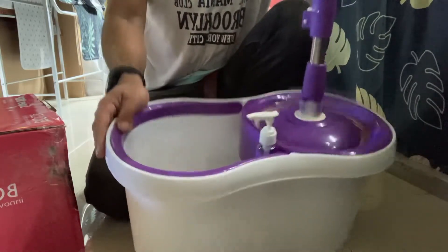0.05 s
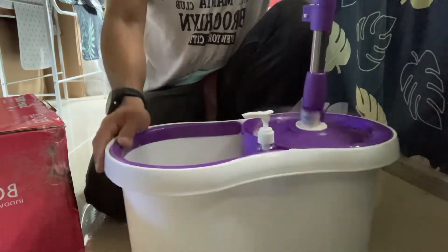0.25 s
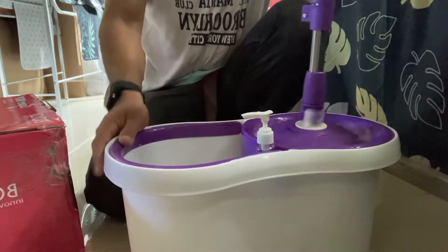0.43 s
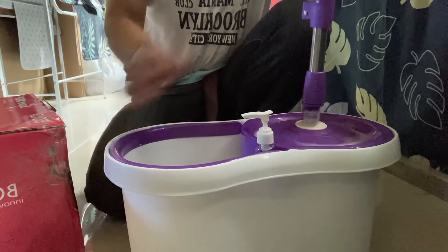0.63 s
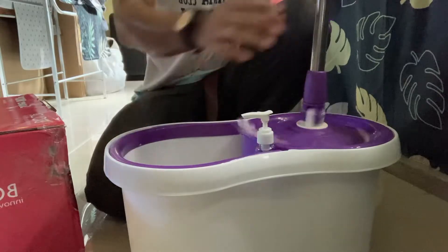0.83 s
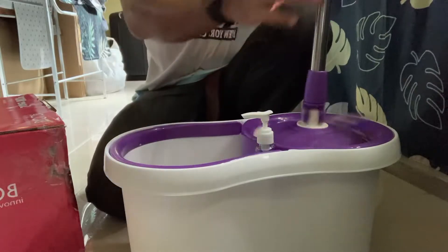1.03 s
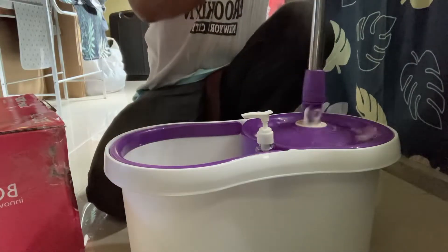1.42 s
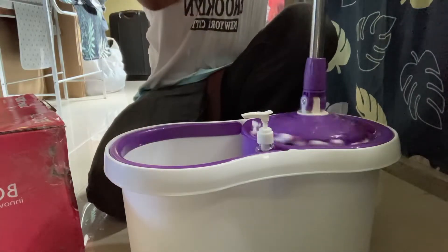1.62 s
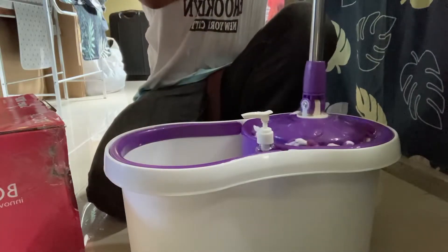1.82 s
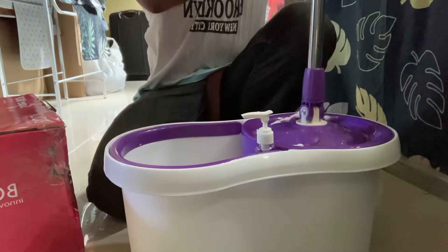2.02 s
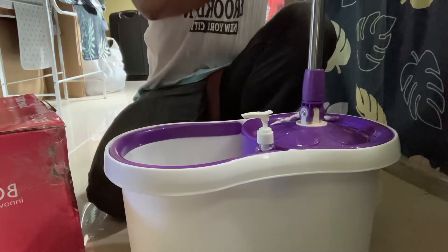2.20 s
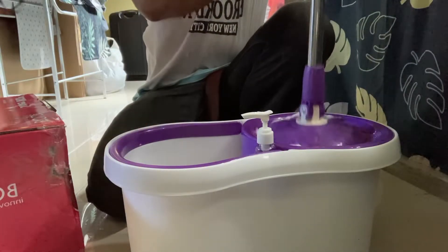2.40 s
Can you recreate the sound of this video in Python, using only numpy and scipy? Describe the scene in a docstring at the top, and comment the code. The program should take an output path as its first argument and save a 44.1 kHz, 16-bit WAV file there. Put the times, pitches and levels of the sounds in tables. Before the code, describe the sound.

A plastic mop bucket thumps onto a hard floor, followed by light clicks and knocks.

```python
"""A plastic spin-mop bucket lands on a hard floor: one edge touches, then the tub booms in its wall modes.
A hand grips the telescopic handle and snaps its lock; the mop head knocks in its basket.
The steel tube slides up with a thin squeak and pings at its catch. Plastic clicks and sleeves rustle.
Blows ring on in a small room, over a low appliance hum and faint room noise."""
import sys
import numpy as np
from scipy import signal
from scipy.fft import rfft, irfft, next_fast_len
from scipy.io import wavfile
from scipy.ndimage import map_coordinates

SR = 44100
rng = np.random.default_rng(int(sys.argv[2]) if len(sys.argv) > 2 else 0)


def to_wav(sig):
    """Store sig (one row per channel, or 1-D mono) as 16-bit WAV at the path in sys.argv[1].

    Samples outside -1..1 are clipped; the rate is SR.
    """
    pcm = np.clip(np.atleast_2d(sig), -1, 1) * 32767
    pcm = np.round(pcm).astype(np.int16)
    wavfile.write(sys.argv[1], SR, pcm.T)  # frames by channels


N = 112454

# bucket on the floor: start_s, level_db, cutoff_hz
LANDINGS = [(0.159, -37, 1190), (0.2312, -5, 7000)]
# tub wall modes: pitch_hz
TUB_MODES_HZ = [285, 350, 378, 450, 563, 620, 761, 872, 965, 1055, 1305, 1548, 1912, 2977]
# the same modes: level_db
TUB_MODES_DB = [-9, 2.5, 6.5, -13, -11.5, -6, -5, -3.5, -10.5, -6.5, -18, -8, -14.5, -23.5]
# tub bottom flexing: start_s, level_db, pitch_hz, t60_s
THUDS = [(0.1412, -9.5, 197.6, 0.056), (0.165, -26.5, 173, 0.12), (0.2396, 5, 171.8, 0.05),
         (1.4315, -28, 158, 0.092), (2.2805, -13.5, 172, 0.04)]
# mop gripped, then knocking in its basket: start_s, level_db, cutoff_hz
KNOCKS = [(0.8345, -37.5, 6000), (1.4255, -31.5, 1500), (1.4292, -24, 4540), (1.4515, -38.5, 3000)]
# mop head and handle modes: pitch_hz, level_db, t60_s
MOP_MODES = [(291.7, -0.5, 0.069), (337.5, -1.5, 0.059), (975, -16, 0.066), (1326, -8, 0.047),
             (1412, -13, 0.13), (1727, -9, 0.092), (2960, -11, 0.046), (3070, -13, 0.056),
             (4040, -15, 0.032)]
# collar and handle taps: start_s, level_db, pitch_hz, t60_s
TAPS = [(0.157, -39, 1220, .04), (0.8345, -28, 1330, 0.038), (0.836, -28, 1715, 0.037),
        (0.9985, -39.5, 2430, 0.024), (1.4335, -35, 1745, 0.039), (2.238, -41, 290, 0.058),
        (2.286, -35, 1140, 0.036), (2.399, -31, 950, 0.032)]
# plastic clicks and scuffs: start_s, mid_db, upper_db, treble_db, t60_s
CLICKS = [(0.081, -64, -45.5, -46.5, 0.043), (0.138, -36, -51, -59, 0.091), (0.156, -37.5, -49, -47, 0.067),
          (0.207, -48, -45, -38, 0.14), (0.2316, -10, -26, -37, .04), (0.402, -38, -50.5, -53, 0.047),
          (0.793, -47, -65, -51, 0.24), (0.826, -31.5, -48, -37, 0.034), (0.834, -27.5, -38, -29, 0.028),
          (0.838, -37.5, -34.5, -36, 0.039), (0.9988, -44.5, -57, -58, 0.11),
          (1.097, -49, -55.5, -58, 0.12), (1.156, -45, -49.5, -62, 0.032), (1.1785, -36, -47, -44, 0.033),
          (1.194, -40, -53, -51, 0.045), (1.343, -45.5, -62, -56.5, 0.046),
          (1.429, -33, -45.5, -47.5, 0.037), (1.497, -41.5, -58, -70, 0.04),
          (1.797, -70, -59, -50.5, 0.028), (1.864, -70, -64, -57, 0.035), (1.925, -51, -50, -50, 0.032),
          (2.238, -53, -52.5, -67, 0.13), (2.266, -39.5, -50, -44, 0.059), (2.283, -30.5, -39.5, -40, 0.06),
          (2.398, -39, -51, -66, 0.032)]
# click spectra, one per band: freq_hz, gain_db
MID_SPECTRUM = [(250, 12), (600, -22), (1000, -3), (1700, -4.5), (2200, -6), (4000, -22), (9000, -65)]
UPPER_SPECTRUM = [(1000, -44), (2000, -7), (3000, 3.5), (4500, 4.5), (6000, -29.5), (9000, -12)]
TREBLE_SPECTRUM = [(2500, -50), (5000, 8.5), (7000, -2.5), (8800, 5.5), (10200, -3), (11500, -27),
                   (13500, -6), (15500, -17)]
# tube squeak: time_s, pitch_hz
SQUEAK_PITCH = [(1.79, 8900), (1.82, 10000), (1.865, 10550), (1.9, 9500), (1.93, 9850), (1.98, 9850),
                (2.03, 8600), (2.08, 9000), (2.11, 8700), (2.17, 9800), (2.27, 9650)]
# tube squeak: time_s, level_db
SQUEAK_LEVEL = [(1.79, -78), (1.85, -64), (1.9, -81), (1.945, -60), (2.0, -86), (2.1, -81), (2.19, -72),
                (2.27, -81)]
# hand and sleeve rubbing: time_s, level_db
RUB_LEVEL = [(0, -52), (.2, -45.5), (.27, -56), (.42, -54), (.48, -62.5), (.77, -60), (.82, -52.5),
             (.89, -53), (.96, -57), (1.12, -57), (1.27, -58), (1.4, -60.5), (1.55, -61), (1.75, -73.5),
             (1.93, -55.5), (2.1, -66.5), (2.33, -59), (2.55, -67)]
# rubbing: freq_hz, gain_db
RUB_SPECTRUM = [(200, 6.5), (600, 4), (1500, 3.5), (3000, -3), (5000, -2), (6700, -10.5), (9000, -5.5),
                (10200, -9.5), (11500, -37.5), (13500, -6), (15500, -33)]
# rumble of the handled tub: time_s, level_db
RUMBLE_LEVEL = [(0, -43.5), (.13, -41.5), (.3, -35), (.5, -47), (.85, -54.5), (1.0, -56), (1.4, -59),
                (1.5, -51), (1.6, -63.5), (2.1, -60.5), (2.3, -43), (2.55, -56)]
# rumble: freq_hz, gain_db
RUMBLE_SPECTRUM = [(25, -15), (50, -4), (110, -5), (180, -2.5), (260, -6), (450, -10.5), (700, -18.5),
                   (2000, -38), (6000, -55)]
# room decay: freq_hz, t60_s
ROOM_DECAY = [(100, 0.8), (180, 0.95), (400, 0.26), (1500, 0.53), (4000, .42), (12000, 0.19)]
# reverb send: freq_hz, gain_db
ROOM_SEND = [(60, -24), (170, -16.5), (240, -24.5), (350, -23.5), (700, -16.5), (1500, -10.5), (4000, -7),
             (12000, -12.5)]
# standing waves: pitch_hz, level_db, t60_s
ROOM_MODES = [(163.4, -71.5, 0.84), (184.3, -73, 0.72)]
# appliance hum: time_s, level_db
HUM_LEVEL = [(0, -51), (.4, -50.5), (.88, -45.5), (.98, -82), (1.35, -55), (1.46, -46.5), (1.7, -50.5),
             (2.0, -48), (2.3, -44.5), (2.55, -44.5)]
# room noise: freq_hz, gain_db
AIR_SPECTRUM = [(25, -1), (50, 0), (110, -6.5), (200, -18), (350, -17), (700, -20.5), (1500, -21),
                (3000, -30.5), (6200, -44.5), (9000, -75.5), (11500, -84), (13500, -58), (15500, -64)]
# left-right likeness of near and of diffuse sound: freq_hz, coherence
NEAR_COHERENCE = [(100, 0.57), (250, 1), (500, 0.54), (1200, 0.62), (2500, 0.16), (5000, 0.84),
                  (9000, 0.53), (14000, 0.42)]
DIFFUSE_COHERENCE = [(100, 0.82), (250, 0.87), (500, 0.6), (1000, 0.22), (2000, 0.023), (9000, .2)]
# balance of the direct blows: freq_hz, left_minus_right_db
BALANCE = [(100, -8), (300, 2), (700, 1), (2500, 4.5), (5000, 5.5), (10000, -1)]
# phase between the microphones: freq_hz, left_lead_rad
PHASE_LEAD = [(0, 0), (2600, 0), (6000, -3.3), (9500, -6.8), (13200, -12.4), (16000, -15.5)]


def bucket(lowest_t60_s=0.052, damping_exponent=0.14):
    """Landings ring the tub walls, higher modes dying sooner; the bottom flexes with dull thuds."""
    modes = [(hz, db, lowest_t60_s * (TUB_MODES_HZ[0] / hz) ** damping_exponent)
             for hz, db in zip(TUB_MODES_HZ, TUB_MODES_DB)]
    walls = strike_modes(LANDINGS, modes, swell_cycles=1.15, spread_rad_per_khz=0.53)
    return walls + strike_single(THUDS, swell_cycles=1.0, spread_rad_per_khz=0.6)


def mop():
    """Knocks ring the mop head and handle; light taps ring one resonance each."""
    knocks = strike_modes(KNOCKS, MOP_MODES, swell_cycles=0.85, spread_rad_per_khz=0.57)
    return knocks + strike_single(TAPS, swell_cycles=3.0, spread_rad_per_khz=0.14)


def strike_modes(blows, modes, swell_cycles, spread_rad_per_khz):
    """Each blow rings all modes; soft contact loses the high ones."""
    out = np.zeros((2, N))
    for start_s, blow_db, cutoff_hz in blows:
        for hz, mode_db, t60_s in modes:
            gain = amp(blow_db + mode_db) / np.hypot(1, (hz / cutoff_hz) ** 2)
            add(out, start_s, gain * ring(hz, t60_s, swell_cycles, spread_rad_per_khz))
    return out


def strike_single(contacts, swell_cycles, spread_rad_per_khz):
    """Each contact rings one resonance."""
    out = np.zeros((2, N))
    for start_s, db, hz, t60_s in contacts:
        add(out, start_s, amp(db) * ring(hz, t60_s, swell_cycles, spread_rad_per_khz))
    return out


def ring(hz, t60_s, swell_cycles, spread_rad_per_khz, rattle_rad_per_khz=0.37):
    """One mode swells and decays; loose plastic jitters its phase."""
    t, khz = np.arange(SR // 4) / SR, hz / 1000
    stereo_rad = spread_rad_per_khz * khz * rng.standard_normal() * np.array([[1], [-1]])
    jitter_rad = rattle_rad_per_khz * khz * wobble(244, size=len(t))
    envelope = (1 - np.exp(-(t * hz / swell_cycles) ** 2)) * amp(-60 * t / t60_s)
    return envelope * np.sin(2 * np.pi * hz * t + stereo_rad + jitter_rad)


def clicks(attack_s=0.00087):
    """Plastic rubs on plastic in short bursts: rim, lock, collar, basket."""
    out, t = np.zeros((2, N)), np.arange(SR // 6) / SR
    spectra = MID_SPECTRUM, UPPER_SPECTRUM, TREBLE_SPECTRUM
    for start_s, *bands_db, t60_s in CLICKS:
        burst = sum(amp(db) * noise(spectrum, NEAR_COHERENCE, size=len(t))
                    for db, spectrum in zip(bands_db, spectra))
        envelope = (1 - np.exp(-t / attack_s)) * amp(-60 * t / t60_s)
        add(out, start_s, burst * envelope)
    return out


def tube(waver_hz=110, flutter_db=4, ping_s=1.925, ping_hz=14750, ping_db=-54, ping_t60_s=0.3):
    """The steel tube slides with a thin squeak and pings once at its catch."""
    t = np.arange(N) / SR
    sliding = (t > SQUEAK_LEVEL[0][0]) & (t < SQUEAK_LEVEL[-1][0])
    squeak_gain = sliding * amp(curve(SQUEAK_LEVEL) + flutter_db * wobble(81))
    squeak = squeak_gain * tone(curve(SQUEAK_PITCH), waver_hz, rate_hz=420)
    ping_gain = (t > ping_s) * amp(ping_db - 60 * np.abs(t - ping_s) / ping_t60_s)
    return squeak + ping_gain * tone(ping_hz, waver_hz, rate_hz=420)


def rustle(grain_db=1.0, lump_db=2):
    """Hand and sleeve rub grainily; the handled tub rumbles."""
    rub = amp(curve(RUB_LEVEL) + grain_db * wobble(170)) * noise(RUB_SPECTRUM, NEAR_COHERENCE)
    rumble_gain = amp(curve(RUMBLE_LEVEL) + lump_db * wobble(24.73))
    return rub + rumble_gain * noise(RUMBLE_SPECTRUM, DIFFUSE_COHERENCE)


def room(x, delay_s=0.008):
    """Wall reflections decay as noise; two standing waves linger."""
    white = noise([(1, 0), (SR, 0)], DIFFUSE_COHERENCE, size=SR)
    hz, frame_s, spectra = signal.stft(white, SR, nperseg=512)
    t60_s = at_hz(ROOM_DECAY, hz)[:, None]
    unit_energy = np.sqrt(2 * np.log(1000) / (t60_s * SR))
    gain = amp(at_hz(ROOM_SEND, hz)[:, None] - 60 * frame_s / t60_s) * unit_energy
    tail = signal.istft(spectra * gain, SR, nperseg=512)[1]
    t = np.arange(tail.shape[1]) / SR
    standing = sum(amp(db - 60 * t / mode_t60_s) * np.sin(2 * np.pi * mode_hz * t)
                   for mode_hz, db, mode_t60_s in ROOM_MODES)
    impulse = np.pad(tail + standing, ((0, 0), (round(delay_s * SR), 0)))
    return signal.fftconvolve(x, impulse, axes=1)[:, :N]


def background(hum_hz=99.3, lower_hz=66, lower_db=-8.5, drift_hz=1.0, air_db=-50):
    """Two low appliance tones beat over faint room noise."""
    upper = tone(hum_hz, drift_hz, rate_hz=6.2)
    lower = amp(lower_db) * tone(lower_hz, drift_hz, rate_hz=6.2)
    hum = amp(curve(HUM_LEVEL)) * np.sqrt(2) * (upper + lower)
    return hum + amp(air_db) * noise(AIR_SPECTRUM, DIFFUSE_COHERENCE)


def amp(db):
    """Decibels to gain."""
    return 10 ** (np.asarray(db) / 20)


def at_hz(points, hz):
    """Interpolate (freq_hz, value) points on a log axis."""
    freq_hz, values = np.transpose(points)
    return np.interp(np.log(hz + 1), np.log(freq_hz + 1), values)


def curve(points):
    """Interpolate (time_s, value) points per sample."""
    return np.interp(np.arange(N) / SR, *np.transpose(points))


def wobble(rate_hz, size=N):
    """Smooth random curve with knots at rate_hz."""
    knots = rng.standard_normal(int(size * rate_hz / SR) + 4)
    return map_coordinates(knots, [np.arange(size) * rate_hz / SR])


def tone(hz, waver_hz, rate_hz):
    """Sine with randomly wavering pitch."""
    return np.sin(2 * np.pi * np.cumsum(hz + waver_hz * wobble(rate_hz)) / SR)


def filtered(x, response):
    """Apply a frequency response by FFT."""
    size = x.shape[-1]
    padded = next_fast_len(size + SR // 4)
    return irfft(rfft(x, padded) * response(np.fft.rfftfreq(padded, 1 / SR)), padded)[..., :size]


def noise(spectrum, coherence, size=N):
    """Unit-rms stereo noise of given spectrum and coherence."""
    def mid_side_gain(hz):
        width_rad = np.arccos(np.clip(at_hz(coherence, hz), -1, 1)) / 2
        return amp(at_hz(spectrum, hz)) * [np.cos(width_rad), np.sin(width_rad)]
    mid, side = filtered(rng.standard_normal((2, size)), mid_side_gain)
    pair = np.array([mid + side, mid - side])
    return pair / pair.std()


def add(track, start_s, sound):
    """Mix a sound into a track."""
    part = track[:, round(start_s * SR):][:, :sound.shape[-1]]
    part += sound[..., :part.shape[1]]


def scene():
    """Blows sit slightly left and excite the room; rustle, tube and background stay dry."""
    split = np.array([[0.5], [-0.5]])  # half a left-right difference per channel
    blows = bucket() + mop() + clicks()
    direct = filtered(blows, lambda hz: amp(at_hz(BALANCE, hz) * split))
    mix = direct + room(blows) + rustle() + tube() + background()
    return filtered(mix, lambda hz: np.exp(1j * np.interp(hz, *np.transpose(PHASE_LEAD)) * split))


def record(dry, low_cut_hz=38.7, ceiling=0.95, high_cut_hz=15800):
    """Microphone chain: low cut, soft clip, steep band limit."""
    thinned = filtered(dry, lambda hz: 1 - 1 / (1 + (hz / low_cut_hz) ** 4))
    clipped = thinned / (1 + np.abs(thinned / ceiling) ** 8) ** (1 / 8)
    return filtered(clipped, lambda hz: 1 / np.hypot(1, (hz / high_cut_hz) ** 60))


dry = scene()
out = record(dry)
to_wav(out)
```